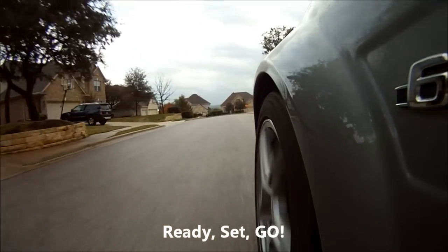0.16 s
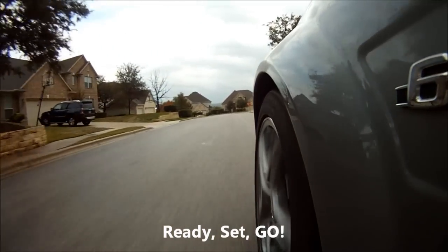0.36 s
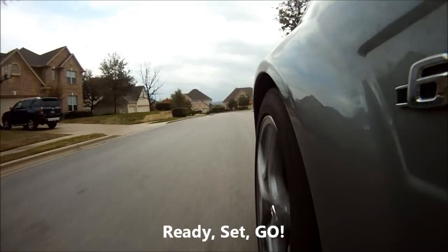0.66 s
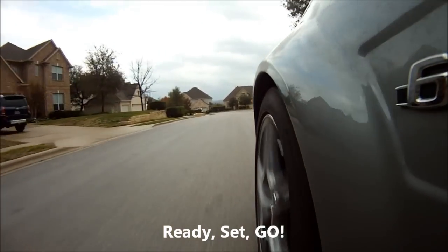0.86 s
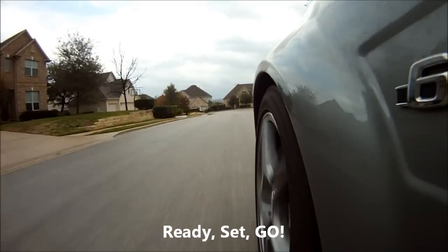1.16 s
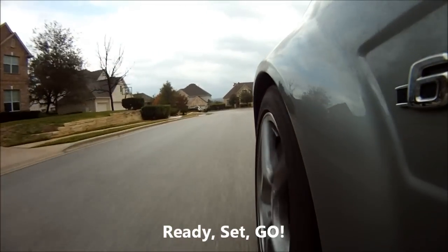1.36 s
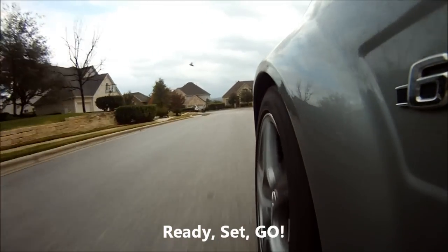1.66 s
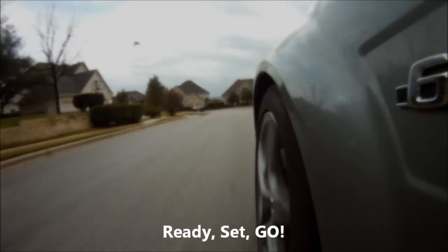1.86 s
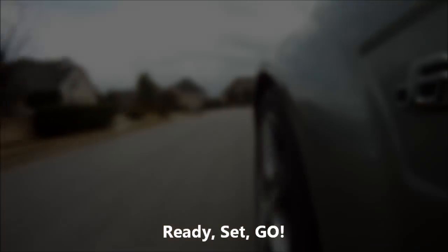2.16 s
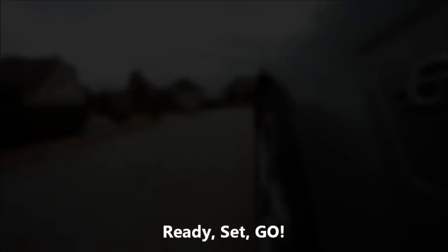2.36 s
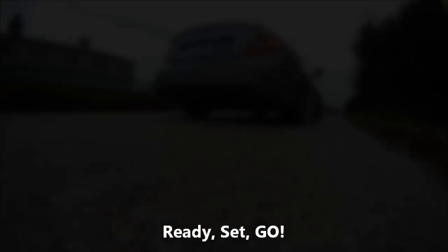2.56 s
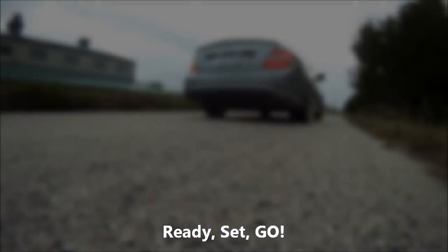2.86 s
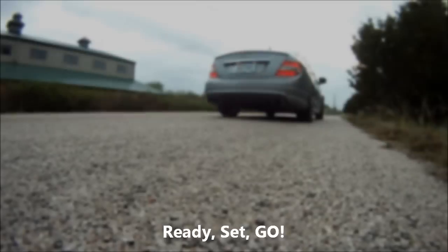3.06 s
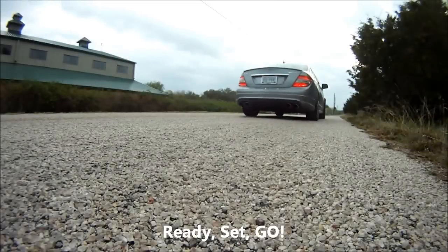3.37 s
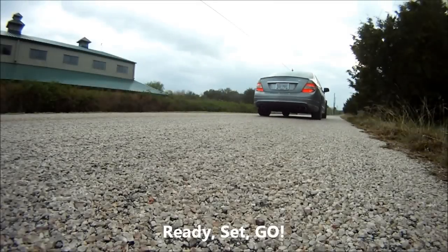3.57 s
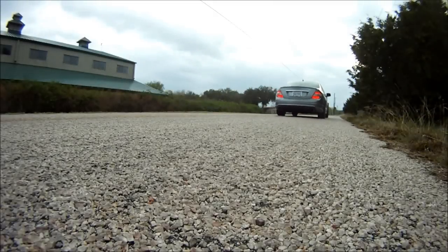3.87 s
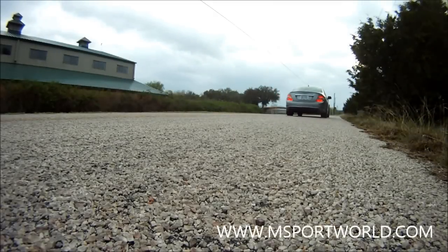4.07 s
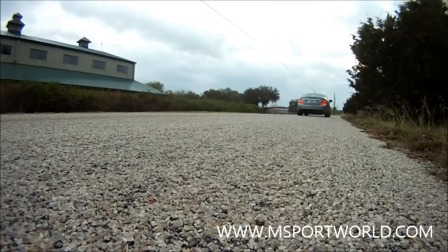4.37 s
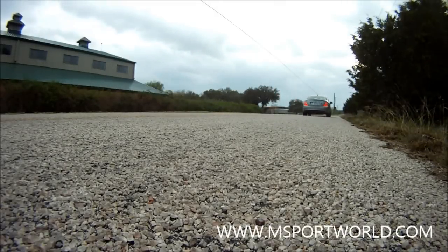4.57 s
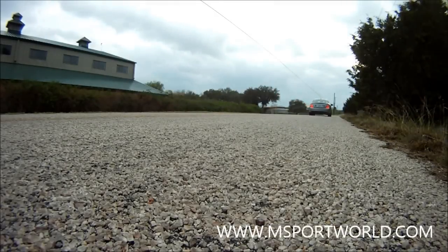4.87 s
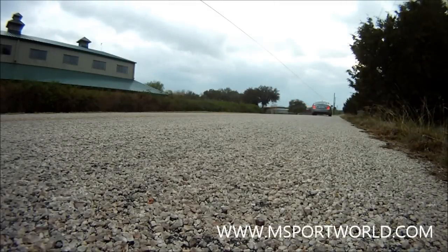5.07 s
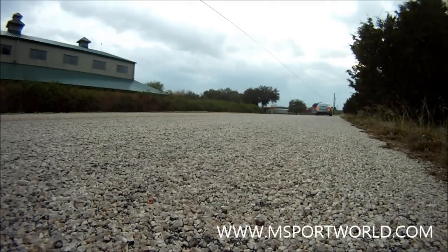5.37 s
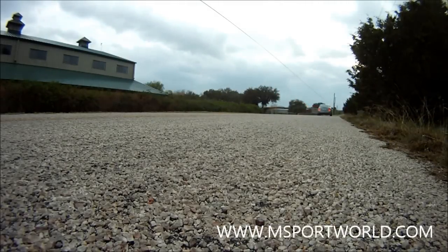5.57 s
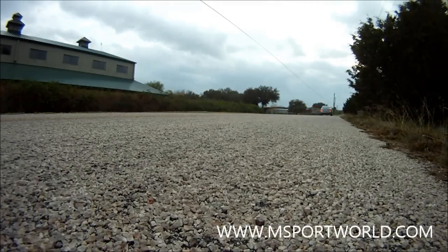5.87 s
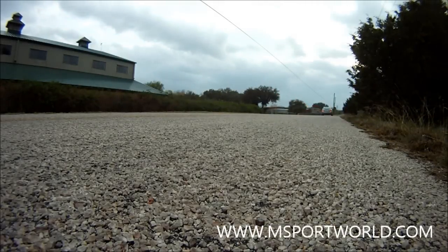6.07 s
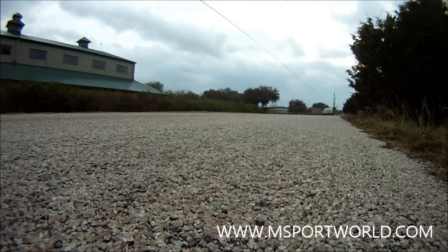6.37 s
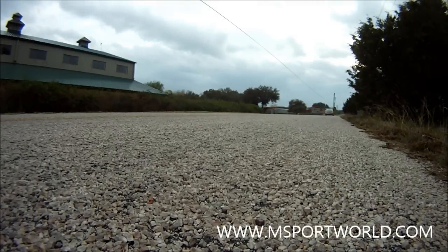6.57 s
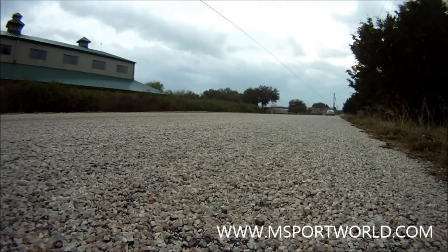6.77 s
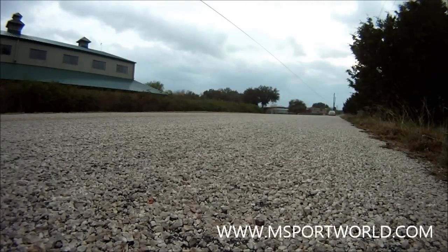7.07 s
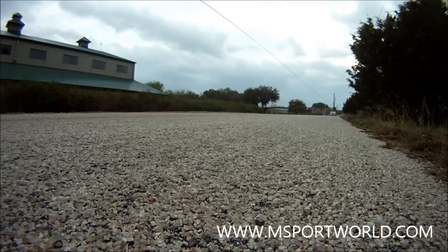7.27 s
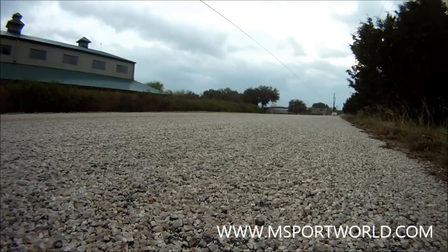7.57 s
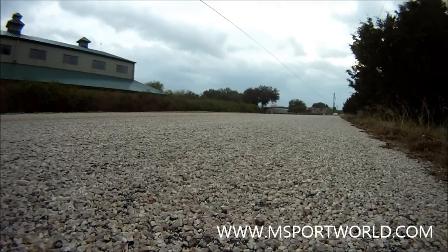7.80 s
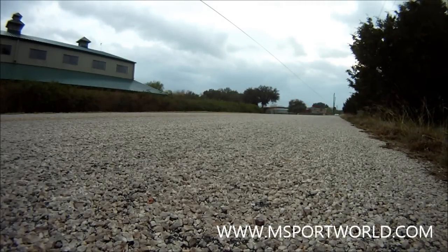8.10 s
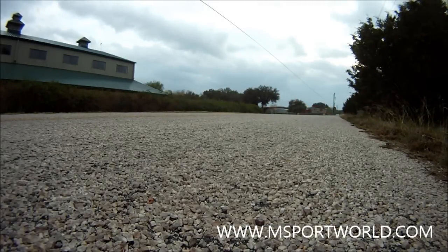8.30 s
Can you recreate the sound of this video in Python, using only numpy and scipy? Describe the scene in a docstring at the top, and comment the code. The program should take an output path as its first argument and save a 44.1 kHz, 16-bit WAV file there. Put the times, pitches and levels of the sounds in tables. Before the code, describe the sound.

Close engine hum, whine and clatter sink in pitch with bumps and rattles, then a lopey V8 exhaust rasps off down a country road.

```python
"""First the microphone, in a hard case, rides on the door of a V8 car as its revs fall off: steady engine
tones, a whine, clatter and rumble, with the mount swaying on bumps and the case rattling.
After 3.268 s it lies on a country road behind the car, which launches, shifts up and roars away.
There firing clicks ring pipe and silencer filters, noise puffs in time make rasp, roar and sizzle, and
thrown stones, wind puffs and steady country air are shaped noise."""
import sys
import numpy as np
from scipy import signal
from scipy.fft import rfft, irfft
from scipy.io import wavfile
from scipy.ndimage import uniform_filter1d

SR = 44100
rng = np.random.default_rng(int(sys.argv[2]) if len(sys.argv) > 2 else 0)


def transcribe(u):
    """Save the signal u as a 16-bit wav file named by the first command-line argument.

    u: samples, shape (n,) or (channels, n), limited to [-1, 1]; the rate is SR.
    q: integer samples, one column per channel.
    """
    v = np.clip(np.atleast_2d(u).T, -1, 1)
    q = np.round(v * 32767).astype(np.int16)
    wavfile.write(sys.argv[1], SR, q)


N = 372204


def amp(db):
    """Decibels to gain."""
    return 10 ** (np.asarray(db) / 20)


def rms_one(x):
    """Scale to rms 1."""
    return x / np.sqrt(np.mean(x ** 2) + 1e-20)


def even(x, seconds):
    """Hold the running rms at 1."""
    return x / np.sqrt(uniform_filter1d(x ** 2, int(seconds * SR)) + 1e-12)


def in_time(rows):
    """Columns of a curve table, one value a sample."""
    s, *columns = np.transpose(rows)
    return [np.interp(np.arange(N) / SR, s, c) for c in columns]


def drift(rate):
    """Slow random wander of rms 1, about rate changes a second."""
    r = np.exp(-2 * np.pi * rate / SR)
    noise = rng.standard_normal(N + SR)
    return rms_one(signal.lfilter([1], [1, -2 * r, r * r], noise)[SR:])


def colour(x, spectrum, modes=()):
    """Causal (minimum-phase) filter from a spectrum, with each resonant mode lifted out of it."""
    size = 8192
    hz = np.maximum(np.fft.rfftfreq(size, 1 / SR), 1)
    points = np.array(spectrum)
    db = np.interp(np.log(hz), np.log(points[:, 0]), points[:, 1])
    for centre, width, lift_db in modes:
        db = db + lift_db / (1 + (2 * (hz - centre) / width) ** 2)
    # folding the cepstrum forward in time gives the minimum phase
    cepstrum = irfft(db * np.log(10) / 20)
    cepstrum[1:size // 2] *= 2
    cepstrum[size // 2 + 1:] = 0
    response = irfft(np.exp(rfft(cepstrum)))
    return signal.fftconvolve(x, response)[:len(x)]


# Blow strength of the eight cylinders in firing order, at full lope: level_db [dB]
CYLINDER_BLOWS = [0, -28, -24, -30, -9, -30, -24, -28]


def firings(cycle_hz, lope, spread_db):
    """One click a firing, eight a cycle, each cylinder with its strength and some chance; also the cycle count."""
    turns = np.cumsum(cycle_hz) / SR
    count = (8 * turns).astype(int)
    at = np.flatnonzero(np.diff(count)) + 1
    strength_db = lope[at] * np.array(CYLINDER_BLOWS)[count[at] % 8]
    clicks = np.zeros(N)
    clicks[at] = amp(strength_db + spread_db * rng.standard_normal(len(at)))
    return clicks, turns


def bursts(clicks, decay_s, share):
    """Noise of which a share comes in puffs that swell and die after each click."""
    r = np.exp(-1 / (decay_s * SR))
    gate = even(signal.lfilter([1], [1, -2 * r, r * r], clicks), seconds=0.18)
    share = np.clip(share, 0, 1)
    return rng.standard_normal(N) * (share * gate + 1 - share)


def orders(turns, levels):
    """Clean sines on multiples of the cycle, levels as rms dB."""
    return np.sqrt(2) * sum(amp(db) * np.sin(2 * np.pi * k * turns) for k, db in levels)


def passing(cycle_hz, rows):
    """Order and level of each tone, loudest where it meets its resonance."""
    levels = []
    for k, top_db, resonance_hz, width_hz in rows:
        detuning = 2 * (k * cycle_hz - resonance_hz) / width_hz
        levels.append((k, top_db - 20 * np.log10(1 + detuning ** 2)))
    return levels


def cyclic(turns):
    """A random pattern of small knocks that comes round again every engine cycle."""
    size = 512
    pattern = rng.standard_normal(size)
    return rms_one(np.interp(turns % 1 * size, np.arange(size), pattern, period=size))


def taps(events, spectrum, noisy_s):
    """Short knocks: a click with a dying noise tail, coloured, peak as given."""
    out, t = np.zeros(N), np.arange(2048) / SR
    for s, db in events:
        tail = (rng.standard_normal(len(t)) + 8 * (t == 0)) * np.exp(-t / noisy_s)
        knock = colour(tail, spectrum)
        i = int(s * SR)
        out[i:i + len(t)] += amp(db) * knock / np.abs(knock).max()
    return out


# Tailpipe colour: pitch_hz [Hz], relative density_db [dB per Hz]
BARK_SPECTRUM = [(200, -39), (280, -7), (350, -0.5), (410, -1.5), (460, 2), (540, -7.5), (640, -12),
                 (800, -13.5), (1000, -32), (1500, -35)]
# Pipe resonances: pitch_hz [Hz], width_hz [Hz], lift_db [dB]
PIPE_MODES = [(344, 54, 4), (461, 40, 4), (527, 75, 6.5)]


def tailpipe_bark(blows, bark_db):
    """Exhaust blows ring the tailpipes."""
    return amp(bark_db) * even(colour(blows, BARK_SPECTRUM, PIPE_MODES), seconds=0.14)


# Silencer box colour: pitch_hz [Hz], relative density_db [dB per Hz]
THROB_SPECTRUM = [(15, -92), (25, -39), (37, -18), (75, -7), (108, -5), (151, -8.5), (280, -11),
                  (360, -14.5), (620, -120)]
# Silencer resonance: pitch_hz [Hz], width_hz [Hz], lift_db [dB]
SILENCER_MODES = [(150, 39, 2)]
THROB_DB, THROB_SLOPE = -40.5, 0.91   # dB at a bark of -33 dB; dB per dB of bark, as low notes carry further


def silencer_throb(blows, bark_db, lift_off_db):
    """Exhaust blows ring the silencer boxes; the throb dies when the driver lifts."""
    throb_db = THROB_DB + THROB_SLOPE * (bark_db + 33) + lift_off_db
    return amp(throb_db) * even(colour(blows, THROB_SPECTRUM, SILENCER_MODES), seconds=0.22)


# Close reflections off road and hedge: delay_s [s], level_db [dB]
ECHOES = [(.0037, -6), (.0085, -12)]


def echoes(x):
    """Close reflections repeat each blow."""
    out = x.copy()
    for delay, db in ECHOES:
        lag = int(delay * SR)
        out[lag:] += amp(db) * x[:-lag]
    return out


BURST_SHARE, BURST_PER_DB = .35, .045   # share of the gas noise in puffs; more per dB of rasp over bark


def gas_jet(clicks, bark_db, rasp_db):
    """Turbulent gas puffs after each firing, uneven from blow to blow and echoed close by."""
    uneven = clicks * amp(2.0 * rng.standard_normal(N))   # varies more than the blow
    share = np.minimum(BURST_SHARE + BURST_PER_DB * (rasp_db - bark_db), .7)
    return bursts(echoes(uneven), decay_s=0.0012, share=share)


# Gas rasp colour: pitch_hz [Hz], relative density_db [dB per Hz]
RASP_SPECTRUM = [(1030, -36), (1750, -16.5), (2020, -4.5), (2310, -5), (2500, -10), (2710, -5),
                 (3000, -14.5), (3300, -16), (3470, -22.5), (3960, -20), (4600, -27), (5980, -43.5),
                 (10100, -120)]
# Resonances of the case on the road: pitch_hz [Hz], width_hz [Hz], lift_db [dB]
ROAD_CASE_MODES = [(2290, 110, 4.5), (2570, 290, 4), (3390, 160, 1)]


def gas_rasp(gas, blows, rasp_db):
    """Gas noise with a little of the echoed blows, rung by the case on the road."""
    jet = gas + amp(-11) * echoes(blows)
    return amp(rasp_db) * rms_one(colour(jet, RASP_SPECTRUM, ROAD_CASE_MODES))


# Roar colour: pitch_hz [Hz], relative density_db [dB per Hz]
ROAR_SPECTRUM = [(350, -53), (600, 1), (766, -3), (963, 5.5), (1070, -4.5), (1130, 5), (1240, -14.5),
                 (1350, 4), (1450, -9), (1800, -7), (2340, -57), (3960, -120)]
ROAR_DB, ROAR_SLOPE = -35.5, 1.285   # dB at a bark of -33 dB; dB per dB of bark
ROAR_FLOOR_DB = -58.5   # the roar sinks no lower: a far road noise
ROAR_BLOWS_DB, ROAR_REPEAT_DB = -6, -4   # weights of the blows and the cyclic part (at full lope) over gas noise


def exhaust_roar(gas, blows, turns, lope, bark_db, lift_off_db):
    """Gas noise, blows and a pattern repeating each cycle; follows the bark down to its floor."""
    repeating = amp(ROAR_REPEAT_DB + lift_off_db) * lope * cyclic(turns)
    mix = gas + amp(ROAR_BLOWS_DB) * blows + repeating
    roar_db = np.maximum(ROAR_DB + ROAR_SLOPE * (bark_db + 33), ROAR_FLOOR_DB)
    return amp(roar_db) * rms_one(colour(mix, ROAR_SPECTRUM))


# Top of the gas jet: pitch_hz [Hz], relative density_db [dB per Hz]
HISS_SPECTRUM = [(4000, -34.5), (4600, -10.5), (5400, 0.5), (5900, 1), (7600, -46)]
HISS_DB, HISS_SLOPE = -46.5, 1.3   # dB at a rasp of -30 dB and 4.2 s; dB per dB of rasp
HISS_DB_PER_S = -1.5   # the top fades first with distance


def gas_hiss(gas, rasp_db):
    """The thin top of the gas jet, falling faster than the rasp."""
    t = np.arange(N) / SR
    hiss_db = HISS_DB + HISS_SLOPE * (rasp_db + 30) + HISS_DB_PER_S * (t - 4.2)
    return amp(hiss_db) * rms_one(colour(gas, HISS_SPECTRUM))


# Firing tones heard on the road: order [multiple of the cycle], top_db [dB rms], resonance_hz [Hz], width_hz [Hz]
FIRING_TONES = [(8, -33, 150, 66), (8, -47, 390, 34)]
FIRING_ENDS_S, FIRING_DB_PER_S = 4.9, -55   # fades from this second as the car draws off
# Fifth-order boom after the upshift: time_s [s], level_db [dB rms]
FIFTH_ORDER = [(5.2, -60), (5.35, -51), (5.75, -41), (5.92, -61), (6.1, -82)]


def road_tones(turns, revs):
    """Steady sines locked to the engine: firing tones at resonances, then a fifth-order boom."""
    late_s = np.maximum(np.arange(N) / SR - FIRING_ENDS_S, 0)
    firing = amp(FIRING_DB_PER_S * late_s) * orders(turns, passing(revs, FIRING_TONES))
    return firing + orders(turns, [(5, in_time(FIFTH_ORDER)[0])])


# Engine tones through the door: order [multiple of the cycle], top_db [dB rms], resonance_hz [Hz], width_hz [Hz]
DOOR_TONES = [(8, -31.5, 190, 15), (8, -44.5, 300, 8), (8, -44, 226, 50), (3, -27.5, 67.1, 7.7),
              (3, -37, 113, 11), (16, -48, 348, 30), (5, -41.5, 190, 18), (6, -41, 217, 30),
              (10, -50, 383, 11), (12, -58, 460, 12), (13, -48, 288, 27)]
# Valve-train whine: time_s [s], level_db [dB]
WHINE_LEVEL = [(0, -36), (.15, -32), (.5, -28), (.62, -36), (.8, -39), (1.1, -54), (1.3, -90)]
# Whine partials: order [multiple of the cycle], relative level_db [dB]
WHINE_ORDERS = [(36, -5), (40, 2.5), (48, -6), (54, -24.5)]


def door_tones(turns, revs):
    """Sines on engine orders swell at body resonances; high orders make the valve-train whine."""
    whine = amp(in_time(WHINE_LEVEL)[0]) * orders(turns, WHINE_ORDERS)
    return orders(turns, passing(revs, DOOR_TONES)) + whine


# Band where the valve knocks ring: low_hz [Hz], high_hz [Hz]
VALVES_HZ = (1350, 2700)
VALVES_DB, VALVES_DB_PER_OCTAVE = -2, 10   # knocks before their band filter, clearer at high revs
# Clatter colour: pitch_hz [Hz], relative density_db [dB per Hz]
CLATTER_SPECTRUM = [(150, -15), (250, -21.5), (444, -7.5), (585, -17.5), (730, -10.5), (815, -14),
                    (1100, -2.5), (1270, -10), (1560, -5), (1690, -10), (2080, -0.5), (3500, -20),
                    (4550, -36.5), (7700, -120)]
# Resonances of the case on the door: pitch_hz [Hz], width_hz [Hz], lift_db [dB]
DOOR_CASE_MODES = [(727, 6.1, 11.5), (1103, 34, 5), (1578, 43, 3.5), (2082, 8.2, 9), (2955, 42, 9)]
# Thin treble of rushing air: pitch_hz [Hz], relative density_db [dB per Hz]
SIZZLE_SPECTRUM = [(2800, -26.5), (3500, 2.5), (4300, -2), (5200, -1.5), (5900, 6.5), (7600, -74)]
CLATTER_DB, CLATTER_DB_PER_OCTAVE, CLATTER_REF_HZ = -24, 7, 39.6   # sinks with the revs; level at ref cycles per s


def door_clatter(clicks, turns, revs):
    """Valve knocks repeat with the cycle over tyre and wind noise, slightly puffed by the firings."""
    octaves = np.log2(revs / CLATTER_REF_HZ)
    valves = signal.sosfilt(signal.butter(2, VALVES_HZ, "band", fs=SR, output="sos"), cyclic(turns))
    noise = bursts(clicks, decay_s=0.0037, share=0.13)
    knock = amp(VALVES_DB + VALVES_DB_PER_OCTAVE * octaves) * valves + noise
    clatter_db = CLATTER_DB + CLATTER_DB_PER_OCTAVE * octaves
    sizzle_db = 1.508 * clatter_db - 3.0   # treble grows faster than the level
    clatter = amp(clatter_db) * rms_one(colour(knock, CLATTER_SPECTRUM, DOOR_CASE_MODES))
    sizzle_modes = [(3755, 92, 8.9), (4990, 540, 9.7)]   # Hz, width Hz, lift dB
    sizzle = amp(sizzle_db) * rms_one(colour(knock, SIZZLE_SPECTRUM, sizzle_modes))
    return (clatter + sizzle) * amp(0.77 * drift(18))


# Road bumps swing the mount: widest_s [s], level_db [dB rms at widest], half_length_s [s]
BUMPS = [(.22, -20, 0.11), (0.51, -23.5, 0.094), (.8, -31, .08), (1.163, -19.5, 0.2), (1.524, -21.5, .12),
         (1.74, -27.5, 0.075), (2.06, -27, 0.16), (2.5, -18, .12), (2.71, -22.5, 0.064), (2.978, -30, 0.12),
         (3.223, -29, 0.067)]
SWAY_HZ, SWAY_TOP_S = 26.28, 1.132   # mount resonance; a moment of full swing


def mount_sway():
    """The mount swings at its resonance, swelling and sinking around each bump."""
    t = np.arange(N) / SR
    swing = sum(amp(db) * np.exp(-((t - s) / half) ** 2) for s, db, half in BUMPS)
    return swing * np.sqrt(2) * np.cos(2 * np.pi * SWAY_HZ * (t - SWAY_TOP_S))


# Camera taps its case near tops of the sway: start_s [s], peak_db [dB]
CASE_TAPS = [(1.056, -15), (1.094, -8.5), (1.1323, -8.5), (1.1746, -7.5), (1.209, -9), (1.2462, -9.5),
             (2.4184, -22), (2.4608, -13), (2.5022, -8), (2.5402, -10), (2.577, -12.5)]
# Colour of hard taps: pitch_hz [Hz], relative density_db [dB per Hz]
TAP_SPECTRUM = [(1200, -42), (1700, -12), (2400, -7), (3200, 5.5), (4300, -6), (5200, 1.5), (6500, 0),
                (9000, -18.5)]


def case_rattle():
    """The camera taps inside its hard case, each a click with a short noise tail."""
    return taps(CASE_TAPS, TAP_SPECTRUM, noisy_s=.0011)


# Thrown stones tick: start_s [s], peak_db [dB]
STONES = [(3.6601, -25), (4.0497, -18), (7.2474, -52)]


def thrown_stones():
    """Stones tick with very short bright knocks."""
    return taps(STONES, TAP_SPECTRUM, noisy_s=0.00087)


# Body and wind colour: pitch_hz [Hz], relative density_db [dB per Hz]
RUMBLE_SPECTRUM = [(24, -41), (40, 3), (49, -2.5), (76, 0.5), (110, -7.5), (140, -25.5), (188, -11),
                   (253, -25), (297, -25), (330, -26), (430, -66), (730, -120)]
# Door panel resonances: pitch_hz [Hz], width_hz [Hz], lift_db [dB]
PANEL_MODES = [(71.1, 6.7, 8.5), (108.5, 11, 5.5), (196, 20, 3.5)]
RUMBLE_DB, RUMBLE_WAVER_DB = -25.5, 2.0   # middle level and spread of its wander


def body_rumble(clicks):
    """Firing clicks and wind noise shake the door panel, with a wavering level."""
    shaking = amp(-3.5) * even(clicks, seconds=0.66) + rng.standard_normal(N)
    level = amp(RUMBLE_DB + RUMBLE_WAVER_DB * drift(4.0))
    return level * even(colour(shaking, RUMBLE_SPECTRUM, PANEL_MODES), seconds=0.21)


# Wind puffs on the microphone port: start_s [s], peak_db [dB]
WIND_PUFFS = [(7.652, -39), (7.949, -42)]
# Colour of a puff: pitch_hz [Hz], relative density_db [dB per Hz]
PUFF_SPECTRUM = [(20, -12), (60, 2), (130, 4), (230, 2), (400, -34)]


def wind_puffs():
    """Wind thumps the microphone port: low, short knocks."""
    return taps(WIND_PUFFS, PUFF_SPECTRUM, noisy_s=0.0027)


# Country air: pitch_hz [Hz], relative density_db [dB per Hz]
AIR_SPECTRUM = [(12, -34.5), (20, -3), (65, -9), (178, -4), (290, -14.5), (455, -6.5), (677, -28),
                (1010, -10), (1210, -11), (1270, -11.5), (1500, -11.5), (1950, -25.5), (3300, -120)]
AIR_DB = -56.5   # middle level


def country_air():
    """Shaped noise with a slight waver."""
    air = rms_one(colour(rng.standard_normal(N), AIR_SPECTRUM))
    return amp(AIR_DB) * air * amp(0.5 * drift(7.9))


# Engine speed heard on the door: time_s [s], cycle_hz [engine cycles per s]
DOOR_REVS = [(0.0, 37.6), (0.23, 38.6), (0.55, 38.2), (0.8, 35.0), (0.94, 32.1), (1.59, 24.3), (1.8, 23.4),
             (2.27, 22.5), (3.27, 20.6)]
CUT_S = 3.268   # the door view ends abruptly


def on_the_door():
    """Engine through the bodywork, mount sway, rattle and rumble."""
    t, revs = np.arange(N) / SR, in_time(DOOR_REVS)[0]
    clicks, turns = firings(revs, np.full(N, .5), spread_db=1.5)
    engine = door_tones(turns, revs) + door_clatter(clicks, turns, revs)
    out = engine + mount_sway() + case_rattle() + body_rumble(clicks)
    return out * np.clip((CUT_S - t) / 0.0027, 0, 1)


# Engine speed heard on the road: time_s [s], cycle_hz [engine cycles per s]
ROAD_REVS = [(2.8, 13.8), (3.19, 17.2), (3.54, 20.5), (3.63, 21.9), (3.98, 31.8), (4.13, 38.5),
             (4.26, 43.1), (4.37, 46.0), (4.59, 43.4), (4.79, 41.9), (4.96, 39.0), (5.12, 38.1),
             (5.3, 30.0), (5.37, 29.3), (5.63, 31.4), (5.77, 33.6), (5.99, 37.5), (6.26, 37.6),
             (6.46, 36.7), (7.18, 42.3), (7.4, 43.3), (8.44, 42.0)]
# How unevenly the cylinders blow; light load is smooth, full load lopes: time_s [s], lope [0-1]
LOPE = [(2.8, .45), (3.55, .5), (3.75, 1), (4.6, 1), (4.8, .8), (5.3, .7), (6.2, .75), (6.6, .92),
        (7.5, .92), (7.7, .6), (8.44, .7)]
# Exhaust level: time_s [s], bark_db [dB], rasp_db [dB]
EXHAUST = [(3.3, -39, -42), (3.71, -36, -41.5), (3.96, -32, -35.5), (4.0, -30, -28), (4.03, -33, -35.5),
           (4.19, -32.5, -27), (4.43, -31.5, -28), (4.6, -38.5, -37), (4.9, -45.5, -48),
           (5.23, -44.5, -47.5), (5.49, -46, -53.5), (5.53, -44.5, -47), (5.7, -43, -49),
           (6.08, -44, -44.5), (6.39, -50, -51.5), (7.05, -49.5, -43), (7.41, -49, -46), (7.61, -67, -52.5),
           (8.22, -72, -52.5), (8.44, -53.5, -51)]
# The road view fades in: time_s [s], level_db [dB]
FADE_IN = [(2.6, -40), (3.0, -5), (3.27, 0)]
CRANK_LAG_S = .009   # when the loud cylinder blows
LIFT_OFF_S, LIFT_OFF_DB_PER_S = 7.42, -200   # the driver lifts


def on_the_road():
    """Exhaust blows ring the pipes and silencers; the gas jet rasps in time with them."""
    t, revs, lope = np.arange(N) / SR, in_time(ROAD_REVS)[0], in_time(LOPE)[0]
    bark_db, rasp_db = in_time(EXHAUST)
    lift_off_db = LIFT_OFF_DB_PER_S * np.maximum(t - LIFT_OFF_S, 0)
    clicks, turns = firings(revs, lope, spread_db=.7)
    clicks = np.roll(clicks, int(CRANK_LAG_S * SR))
    # the smoother the load, the more noise in the blows
    blows = even(clicks, seconds=.2) + amp(6 - 18 * lope) * rng.standard_normal(N)
    gas = gas_jet(clicks, bark_db, rasp_db)
    out = tailpipe_bark(blows, bark_db) + silencer_throb(blows, bark_db, lift_off_db)
    out += gas_rasp(gas, blows, rasp_db) + gas_hiss(gas, rasp_db)
    out += exhaust_roar(gas, blows, turns, lope, bark_db, lift_off_db)
    out += road_tones(turns, revs) + country_air()
    return out * amp(in_time(FADE_IN)[0]) + thrown_stones() + wind_puffs()


def scene():
    """Door view, then road view."""
    return (on_the_door() + on_the_road())[None]


CUTOFF_HZ = 16250   # top of the microphone's sound


def record(dry):
    """Sampled at 12 kHz, each sample held four times, which mirrors the sound about 12 kHz; the top is cut."""
    smooth = signal.sosfilt(signal.cheby2(8, 30, 6150, fs=SR, output="sos"), dry)
    sampled = signal.resample_poly(smooth, 40, 147, axis=1)   # to 12 kHz
    held = np.repeat(sampled, 4, axis=1)   # 48 kHz
    out = signal.resample_poly(held, 147, 160, axis=1)[:, :N]   # back to SR
    out = np.pad(out, ((0, 0), (0, N - out.shape[1])))
    return signal.sosfilt(signal.cheby2(12, 70, CUTOFF_HZ, fs=SR, output="sos"), out)


dry = scene()
out = record(dry)
transcribe(out)
```